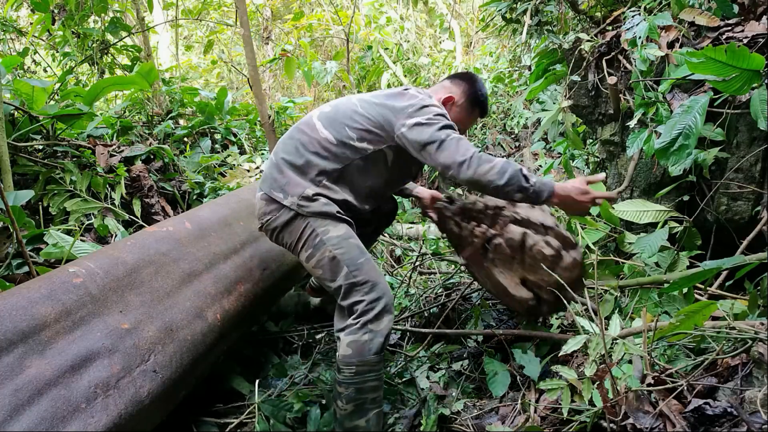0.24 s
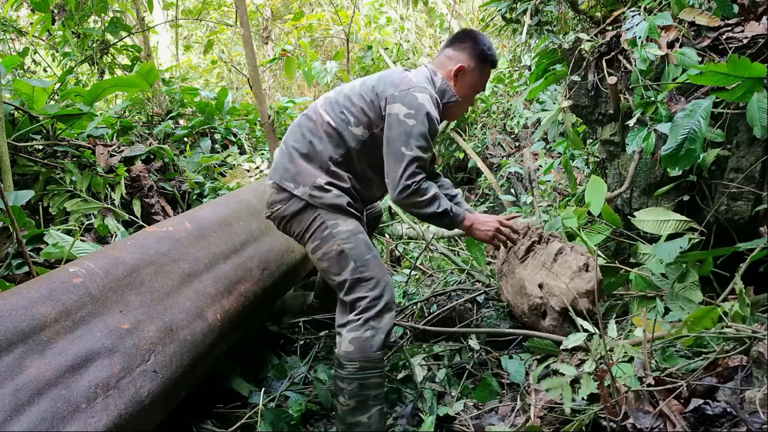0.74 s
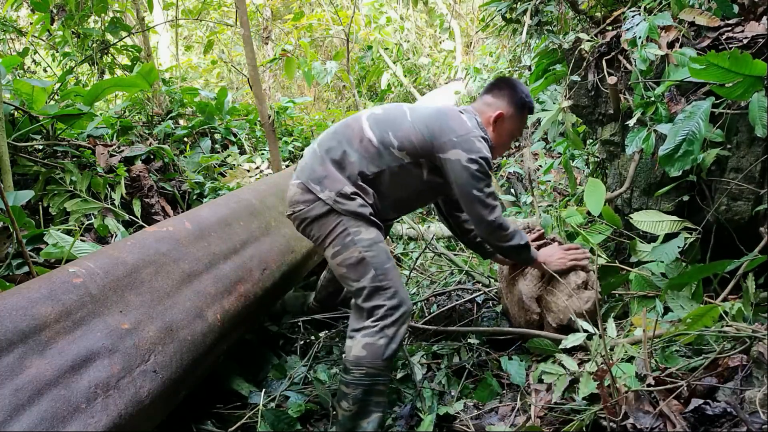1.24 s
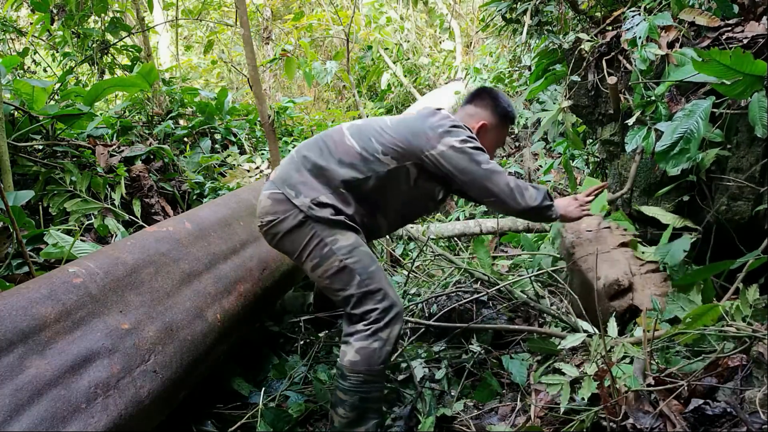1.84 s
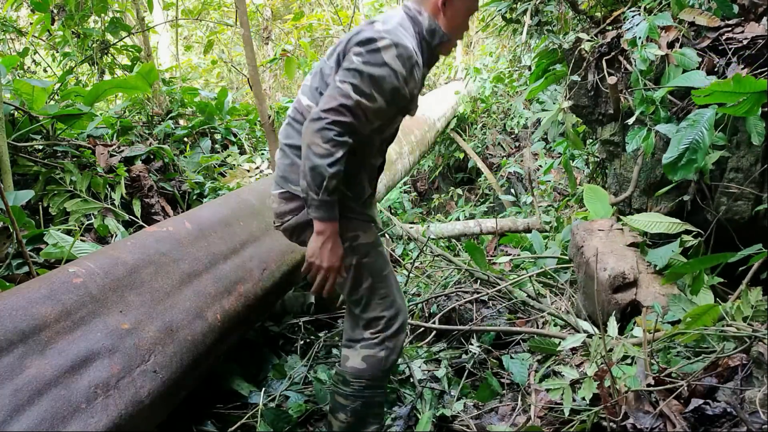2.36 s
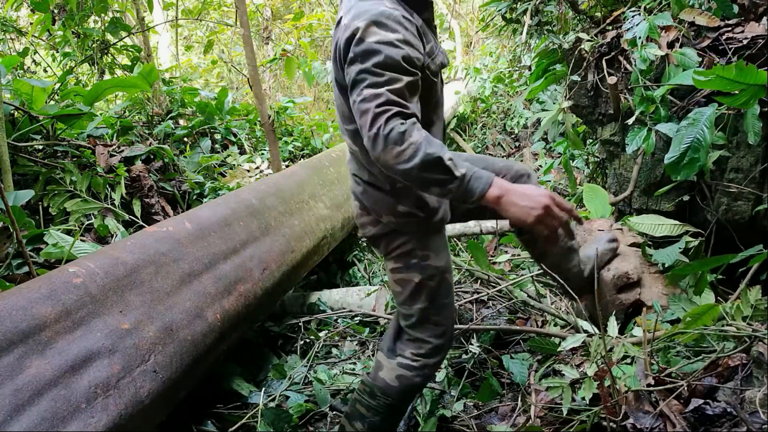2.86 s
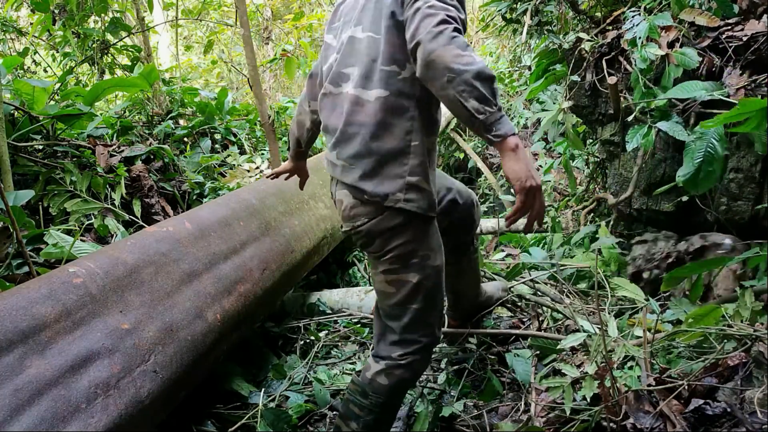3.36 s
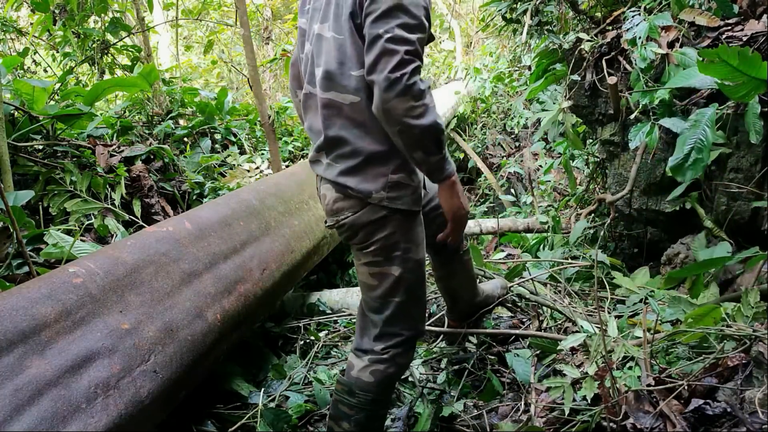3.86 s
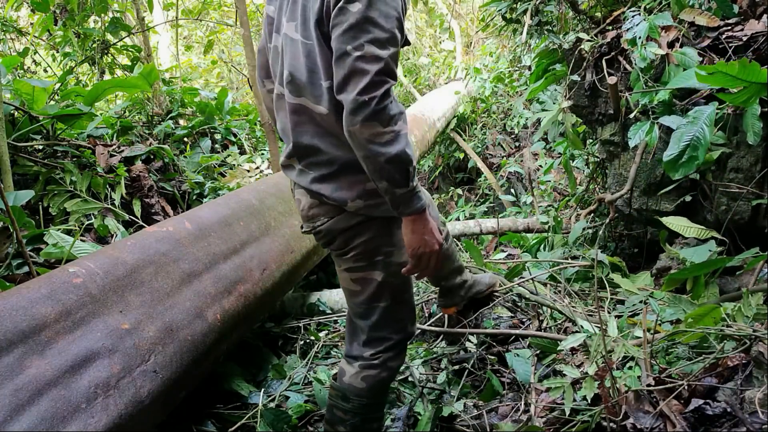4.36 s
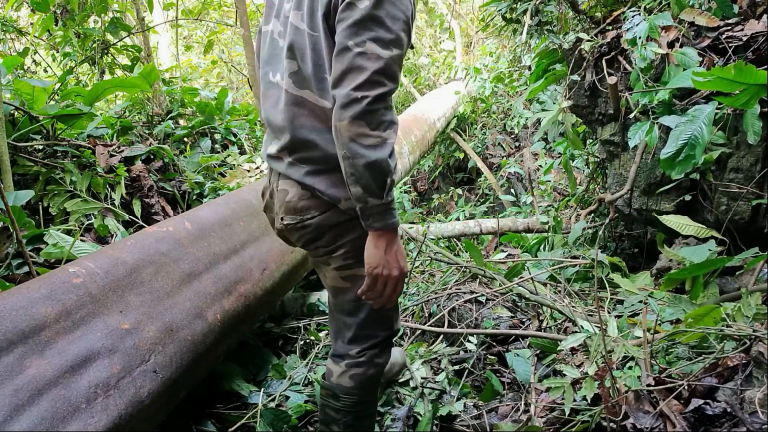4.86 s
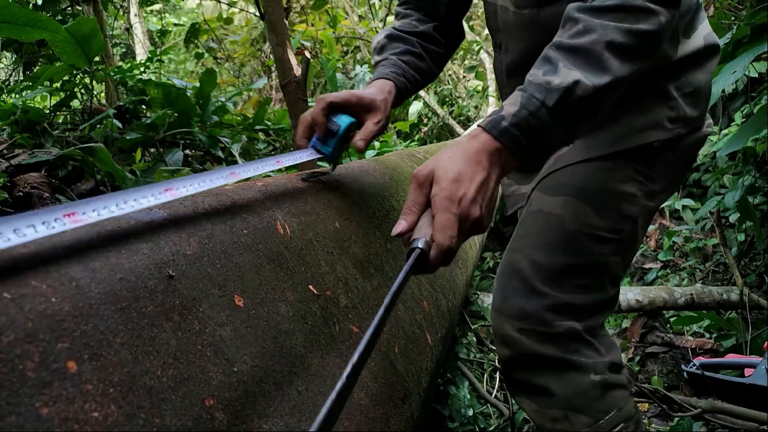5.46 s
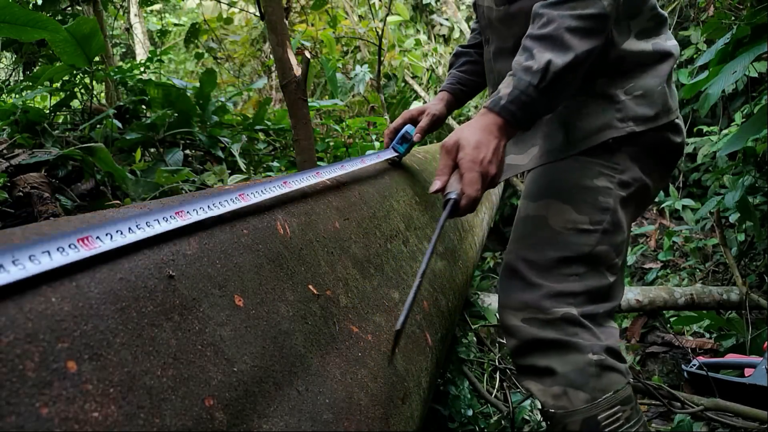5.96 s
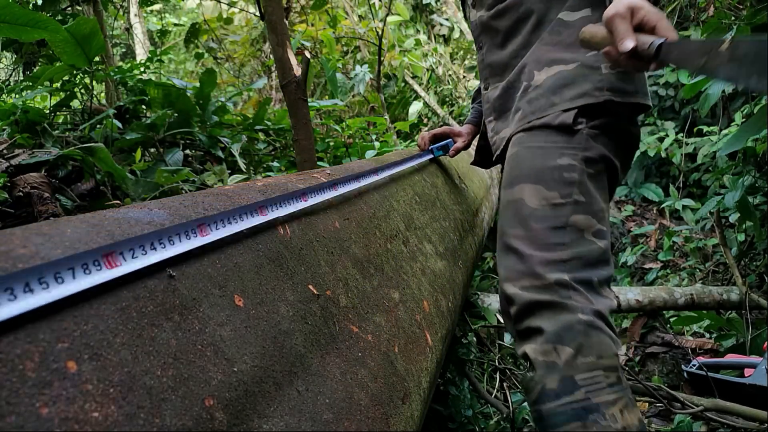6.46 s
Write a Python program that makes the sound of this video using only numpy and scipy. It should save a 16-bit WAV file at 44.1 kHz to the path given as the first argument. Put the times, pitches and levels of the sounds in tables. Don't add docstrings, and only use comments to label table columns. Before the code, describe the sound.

Quiet forest air with distant whistles; one sharp woody crash, rustling leaves, a louder hollow double knock, then faint ticks and brushing on bark.

```python
import sys
import numpy as np
from scipy import signal
from scipy.fft import rfft, irfft, next_fast_len
from scipy.io import wavfile
from scipy.ndimage import uniform_filter1d

SR = 44100
rng = np.random.default_rng(int(sys.argv[2]) if len(sys.argv) > 2 else 0)


def boost(x):
    u = np.asarray(x, float) / 20
    return 10 ** u


def to_wav(s):
    ch = np.atleast_2d(s).T
    pcm = np.round(np.clip(ch, -1, 1) * 32767)
    wavfile.write(sys.argv[1], SR, pcm.astype(np.int16))


N = 295911
T = np.arange(N) / SR
CUT_S = 5.135


def level(x):
    return x / np.sqrt(np.mean(x ** 2))


def colour(x, points):
    hz, db = np.transpose(points)
    length = x.shape[-1]
    size = next_fast_len(length)
    log_hz = np.log(np.fft.rfftfreq(size, 1 / SR) + 1)
    gain = boost(np.interp(log_hz, np.log(hz), db, left=-90, right=-90))
    return irfft(rfft(x, size) * gain, size)[..., :length]


def noise(*shape):
    return rng.standard_normal(shape)


def walk(rate):
    hold = int(SR / rate)
    steps = np.repeat(noise(N // hold + 1), hold)
    return 1.2 * uniform_filter1d(steps, hold)[:N]


def add(out, x, s):
    i = int(s * SR)
    n = min(len(x), N - i)
    out[i:i + n] += x[:n]


def decay(t, t60):
    return np.exp(-np.log(1000) * t / t60)


def ring(modes, contact, share=0.85, tint_db=0., crack_db=-18):
    hz, db, t60 = np.transpose(modes)[:, :, None]
    t = T[:SR // 4]
    sense = (-1.) ** np.arange(len(hz))[:, None]
    tones = sense * boost(db + tint_db) * np.sin(2 * np.pi * hz * t) * decay(t, t60 * share)
    push = T[:600] * np.exp(-4 * T[:600] / contact)
    body = signal.fftconvolve(np.sum(tones, axis=0), push)[:len(t)]
    body = body * np.clip((t[-1] - t) / .05, 0, 1)
    bark = [(0.29 / contact, -20), (1.5 / contact, 0), (2.0 / contact, -12), (6 / contact, -42)]
    crack = np.exp(-t / 0.0045) * colour(noise(len(t)), bark)
    return body / np.max(np.abs(body)) + boost(crack_db) * crack / np.max(np.abs(crack))


def grains(rate, spread_db, smooth):
    size = boost(spread_db * np.minimum(rng.exponential(size=N), 2))
    clicks = size * (rng.random(N) < rate / SR) * rng.uniform(-1.02, 1, N)
    return level(clicks) + smooth * noise(N)


def sweeps(peak_s, peak_db, rise_db_s, fall_db_s):
    coarse = T[::44]
    since = coarse - peak_s[:, None]
    slope = np.where(since < 0, np.reshape(rise_db_s, (-1, 1)) * since, -fall_db_s * since)
    return np.interp(T, coarse, boost(peak_db[:, None] + slope).sum(axis=0))


# time_s, left_port_late_by_samples, left_minus_right_db
POSITION = [
    (0, 9, -1),
    (.44, 9, -1),
    (.48, 9, 2),
    (1.4, 9, -1),
    (3.0, 11, -2.5),
    (4.9, 11, -1),
    (5.2, -9, 3),
    (6.2, -9, 3),
    (6.5, 8, 0),
]


def ports(x, pan_db, apart, lag_share=0.96):
    s, lag, side_db = np.transpose(POSITION)
    half_lag = lag_share * np.interp(T, s, lag) / 2
    side_db = np.interp(T, s, side_db) + pan_db
    treble = signal.lfilter([1, -1], [1, -.88], x)
    out = []
    for side in (1, -1):
        scatter = noise(2000) * np.exp(-T[:2000] / .007) / 12
        delay = np.round(side * half_lag).astype(int)
        direct = x[np.clip(np.arange(N) - delay, 0, N - 1)]
        scattered = signal.fftconvolve(treble, scatter)[:N]
        out.append(boost(side * side_db / 2) * (direct + apart * scattered))
    return np.array(out)


# pitch_hz, level_db (per Hz)
FOREST_AIR = [(15, -3.5), (25, 7), (45, -12.5), (110, -16.5), (350, -19.5), (700, -27), (1150, -29.5),
              (2000, -29.5), (2700, -27), (3800, -28), (5600, -29), (8500, -38.5), (14500, -44.5),
              (16000, -51)]
# pitch_hz, width_hz, level_db
CHORUS = [
    (7186, 1500, -66),
    (3003, 640, -66.5),
    (1530, 310, -68.5),
]
CHORUS_CHANGE = (-0.5, -6.5, -9.5)


def forest():
    mid, side = colour(noise(2, N), FOREST_AIR)
    side = colour(side, [(15, 9.5), (150, -3), (600, -4.5), (1500, 1.0), (20000, -0.5)])
    air = (mid + side * np.array([[1], [-1]])) / np.std(mid)
    out = boost(-60 + 0.27 * walk(6.7)) * air
    for (hz, width, db), change_db in zip(CHORUS, CHORUS_CHANGE):
        shape = [(hz - width, -25), (hz - width / 3, -3), (hz, 0), (hz + width / 3, -2), (hz + width * 0.88, -25)]
        gain = boost(db + change_db * (T > CUT_S) + .7 * walk(8))
        out = out + gain * level(colour(noise(2, N), shape))
    return out


# pitch_hz, level_db
SWAY = [(3, -4), (8, 3), (14, -7.5), (22, -23.5)]


def mount_sway():
    return boost(-43) * level(colour(noise(N), SWAY))


# time_s, leaf_stir_db, load_on_sticks_and_soil_db
STIR = [(0, -66, -71), (.37, -77, -75), (.56, -50.5, -60), (.7, -51.5, -56.5), (.84, -59.5, -60.5),
        (1.06, -63, -61), (1.29, -73, -79), (1.74, -63, -62), (2.02, -60.5, -60.5), (2.75, -79, -72),
        (2.97, -68.5, -72), (3.059, -54.5, -55.5), (3.44, -53.5, -48), (3.66, -56, -54),
        (4.07, -65.5, -65.5), (4.3, -79.5, -76), (5.53, -76.5, -77), (6.199, -90, -76), (6.71, -61.5, -65)]
# peak_s, leaves_db, soil_jolt_db, build_up_db_per_s, dry_top_minus_leaves_db
SWEEPS = [(.335, -67.5, -65, 910, -2), (0.391, -46.5, -57, 2499, -30), (0.432, -57, -43.5, 302.5, -30),
          (0.487, -25.5, -37, 344, -8.5), (1.641, -51.5, -74, 245, -9.5), (1.96, -49, -49.5, 700, -14),
          (2.075, -81, -91, 1502, 10), (2.9, -59, -52, 2500, -10.5), (3.017, -53.5, -61, 2500, -10),
          (3.059, -47.5, -59.5, 1800, -19), (3.078, -50, -51.5, 1500, 4.5),
          (3.132, -42.5, -58.5, 1500, -7.5), (3.21, -57, -68.5, 159, -2), (3.33, -61.5, -60, 398, -4.5),
          (3.484, -45.5, -38.5, 902, -11.5), (3.555, -49, -54.5, 600, -5.5), (3.599, -51, -28.5, 300, -10),
          (4.002, -68.5, -63, 1500, 4), (4.102, -52.5, -57, 1997.5, -20), (4.177, -42, -56.5, 3000, -11),
          (4.76, -80.5, -80, 100, 6.5), (5.03, -72, -79, 1500, -3), (5.09, -69.5, -72, 300, -4),
          (5.135, -77, -80, 1000, -11), (5.55, -73, -73, 41, -2.5), (5.665, -70, -78, 1500, 0),
          (5.695, -71.5, -67, 300, 0), (6.66, -64.5, -80, 66, -7)]
# pitch_hz, level_db
LEAVES = [(500, 4), (1200, 2), (2000, 7), (3500, 5.5), (6000, -4), (8000, -7), (11000, -57), (16000, -116)]
# pitch_hz, level_db
DRY_TOP = [(5000, -23.5), (7500, -11), (9000, -17.5), (12000, -16.5), (14500, -24.5), (16000, -22)]
# pitch_hz, level_db
STICKS = [(200, -32), (400, -6), (700, 4.5), (1000, -1.5), (1500, -4), (2500, -16)]
# pitch_hz, level_db
GROUND = [(15, -29), (35, -3), (70, 5.5), (150, -8), (300, -0.5), (500, -15)]
SETTLE_DB_S, JOLT_RISE_DB_S, JOLT_DB_S = 304, 1200, 196
TOP_DB, STICK_DB, SOIL_DB, JOLT_STICK_DB = -13, -5, -1.45, -16.5


def litter():
    s, stir_db, load_db = np.transpose(STIR)
    peak_s, sweep_db, jolt_db, rise, dry_db = np.transpose(SWEEPS)
    stir_db = np.interp(T, s, stir_db)
    stirred = boost(stir_db) + sweeps(peak_s, sweep_db, rise, SETTLE_DB_S)
    crisp = boost(stir_db + TOP_DB) + sweeps(peak_s, sweep_db + dry_db, rise, SETTLE_DB_S)
    load = boost(np.interp(T, s, load_db))
    jolt = sweeps(peak_s, jolt_db, JOLT_RISE_DB_S, JOLT_DB_S)

    crackle = grains(1200., spread_db=4.5, smooth=.6) * boost(2 * walk(30))
    leaves = level(colour(crackle, LEAVES))
    dry_top = level(colour(crackle, DRY_TOP))
    clack = (boost(STICK_DB) * load + boost(JOLT_STICK_DB) * jolt) * boost(2 * walk(28))
    sticks = level(colour(grains(500., spread_db=3.5, smooth=.7), STICKS))
    rumble = level(colour(grains(200., spread_db=3.0, smooth=.9), GROUND))
    soil = (boost(SOIL_DB) * load + jolt) * boost(2 * walk(15)) * rumble

    patches = []
    for k in (0, N // 3, 2 * N // 3):
        patch = 0.76 * stirred * np.roll(leaves, k) + crisp * np.roll(dry_top, k)
        patches.append(patch + clack * np.roll(sticks, k))
    shared, left, right = patches
    return ports(shared + soil, 0., apart=0.24) + 1.406 * np.array([left, right])


# start_s, peak_db, contact_cutoff_hz, ring_share (0 to 1)
BLOWS = [(0.029, -48.5, 1300, 0.58), (.388, -40, 870, 0.44), (0.4735, -13.5, 320, 0.2),
         (0.482, -16, 330, 0.45), (1.612, -60, 1300, 0.12), (1.635, -44.5, 1500, 0.19),
         (1.681, -51, 200, .95), (1.956, -42.5, 600, 0.4), (1.986, -49, 500, 0.35), (2.03, -51, 300, 0.2),
         (2.15, -47, 990, 0.2), (2.55, -48, 420, 0.3), (2.574, -52, 300, 0.9), (2.8972, -28.5, 1000, 0.31),
         (3.058, -41, 1205, .3), (3.14, -37.5, 395.7, .95), (3.267, -35, 246.6, 0.7), (3.289, -33, 245, .6),
         (3.315, -36, 910, 0.3), (3.329, -39, 252, .5), (3.396, -35.5, 1000, .95), (3.423, -34, 1000, 0.1),
         (3.494, -34, 600, .7), (3.515, -31, 623, .7), (3.53, -34, 300, .1), (3.564, -29, 400, .6),
         (3.687, -33.5, 399, 0.7), (3.789, -29.5, 200, .7), (4.176, -43.5, 1500, 0.36)]
# start_s, peak_db
STEPS = [
    (4.94, -54.5),
    (4.981, -59.5),
    (5.081, -68),
    (5.11, -55),
]
# start_s, peak_db
TAPS = [
    (6.53, -62),
    (6.567, -66),
    (6.601, -54),
    (6.639, -57),
    (6.67, -62),
    (6.7, -60),
]
# pitch_hz, level_db, t60_s
BLOCK = [(74.4, 4.5, 0.055), (113.9, -6, 0.13), (154, 0.5, 0.074), (234.6, 4, 0.13), (300, 2.5, 0.094),
         (366.8, -3.5, 0.16), (468.4, 2.5, 0.009), (621, 3, 0.082), (690, 0.5, 0.028), (774, 8.5, 0.12),
         (903, 2.5, 0.064), (1190, 14, 0.079), (1500, 3.5, 0.017), (1889, 5, .014), (2508, -18.5, .02)]


def block():
    out = np.zeros(N)
    rocks = [(.52 + k * 0.023, -33.5 - 4.5 * k, 129, 0.78) for k in range(4)]
    steps = [(s, db, 1300, 0.2) for s, db in STEPS]
    taps = [(s, db, 750, 0.11) for s, db in TAPS]
    for s, db, hz, share in list(BLOWS) + rocks + steps + taps:
        detune, tint = noise(2, len(BLOCK))
        modes = np.array(BLOCK, float)
        modes[:, 0] *= 1 + .04 * detune
        blow = ring(modes, 0.9 / hz, share=max(share, .1) * 2.1, tint_db=2 * tint[:, None])
        add(out, boost(db) * blow, s)
    return ports(out, 0.9, apart=0.6)


# start_s, peak_db, centre_hz
SNAPS = [(0.033, -46, 3110), (0.3292, -43.5, 3100), (0.3864, -37.5, 3500), (0.4643, -39, 5250),
         (0.4745, -14, 2500), (0.4797, -7.5, 5130), (0.4915, -10, 2210), (0.5086, -22.5, 2400),
         (1.431, -49, 7420), (1.613, -57, 3000), (1.637, -31.5, 7000), (1.956, -33.5, 3880),
         (1.972, -38, 3880), (1.9833, -55, 2850), (2.0341, -44, 3720), (2.07, -47, 4100),
         (2.2032, -42.5, 3620), (3.017, -43, 7820), (3.0584, -37.5, 3950), (3.076, -22.5, 4770),
         (3.1306, -22.5, 2943), (3.146, -26.5, 6770), (3.1777, -44.5, 2890), (3.4914, -39, 3770),
         (3.5604, -37.5, 3496), (3.9965, -58, 3070), (4.0974, -49, 3700), (4.177, -47, 7000),
         (4.1795, -29, 3270)]
# start_s, peak_db
TICKS = [(5.0784, -43), (5.585, -46), (5.6888, -45), (5.9266, -49.5), (6.439, -56.5), (6.4785, -47.5),
         (6.598, -59), (6.636, -44), (6.662, -55), (6.699, -60)]


def snaps():
    out, t = np.zeros(N), T[:SR // 4]
    fade = decay(t, .01) + 2.8 * np.exp(-t / 0.0017)
    for s, db, hz in list(SNAPS) + [(s, db, 3100) for s, db in TICKS]:
        shape = [(hz / 8, -24), (hz / 3, -6), (hz, 0), (hz + 3500, -6), (15000, -20), (16300, -40)]
        burst = fade * colour(noise(len(t)), shape)
        add(out, boost(db) * burst / np.max(np.abs(burst)), s)
    return ports(out, 0., apart=1.0)


# start_s, length_s, start_hz, level_db
FULL_BIRD = [
    (3.87, 0.1, 1533, -62.5),
    (4.25, 0.29, 1546, -63.5),
    (4.55, 0.18, 1606, -72),
    (4.735, 0.31, 1556, -60),
]
THIN_BIRD = [(.045, 0.268, 1458, -63.5), (.93, 0.16, 1470, -72), (1.2, 0.21, 1530, -78),
             (2.1, 0.12, 1530, -76), (2.45, 0.23, 1530, -78), (3.9, 0.24, 1523, -71.5),
             (4.24, 0.05, 1530, -56), (4.53, 0.235, 1523, -63), (5.04, 0.13, 1521, -57),
             (5.55, 0.24, 1548, -73), (6.2, 0.24, 1550, -73)]
DULL_BIRD = [
    (.16, 0.22, 1528, -69.5),
    (.66, 0.14, 1540, -64.5),
    (1.12, 0.18, 1518, -67),
    (1.46, 0.072, 1500, -73),
    (2.4, 0.205, 1500, -66),
    (2.92, 0.14, 1500, -71),
]
# first_db, second_db (an octave up)
FULL_TONES = (-2.5, 0.5)
THIN_TONES = (-11.5, 1)
DULL_TONES = (0., -8.)
RISE_HZ_S, SWELL_S, FADE_S = 179.3, 0.033, 0.043


def bird():
    out = np.zeros(N)
    wobble, flutter = 1 + .0045 * walk(70), boost(3 * walk(55))
    birds = ((FULL_BIRD, FULL_TONES), (THIN_BIRD, THIN_TONES), (DULL_BIRD, DULL_TONES))
    for notes, (low_db, high_db) in birds:
        for start, length, hz, db in notes:
            t = T[:int(length * SR)]
            gate = np.clip(np.minimum(t / SWELL_S, (t[-1] - t) / FADE_S), 0, 1)
            pitch = (hz + RISE_HZ_S * t) * wobble[int(start * SR):][:len(t)]
            phase = 2 * np.pi * np.cumsum(pitch) / SR
            whistle = boost(low_db) * np.sin(phase) + boost(high_db) * np.sin(2 * phase)
            add(out, boost(db) * gate * whistle, start)
    return ports(np.sqrt(2) * out * flutter, -3.5, apart=0.49, lag_share=0)


# start_s, peak_db, pitch_hz,
# t60_s
KNOCKS = [(.463, -30, 262, 0.041), (.477, -12, 1946, .05), (.502, -25, 239, .1), (.521, -32.5, 62, .35),
          (.56, -33, 55, .4), (.645, -41.5, 300, 0.074), (.68, -44, 300, .06), (.715, -56, 150, .08),
          (.86, -47.5, 166, 0.24), (1.6084, -42, 590, 0.0094), (1.6146, -36, 960, 0.021),
          (1.636, -29.5, 890, 0.0088), (1.6089, -36, 1500, 0.011), (1.621, -47, 2680, .012),
          (1.637, -32, 1600, 0.012), (1.6405, -36, 2600, .012), (1.642, -43, 1000, 0.017),
          (1.66, -44, 2600, .015), (1.79, -50.5, 175, 0.091), (2.899, -30.5, 201, 0.029),
          (3.02, -44, 750, 0.036), (3.058, -33.5, 925, 0.027), (3.1305, -27, 1700, .015),
          (3.396, -31, 1080, 0.02), (3.425, -40, 1300, .02), (3.264, -38, 120, .08), (3.289, -34, 94, 0.1),
          (3.316, -36, 1110, .02), (3.492, -30.5, 87.4, 0.21), (3.512, -37, 556, .08),
          (3.567, -26, 170, 0.066), (3.5929, -17.5, 790, 0.028), (3.5965, -16.5, 1080, 0.026),
          (3.5983, -10, 190, .04), (3.6033, -14, 300, .04), (3.618, -19, 330, .06), (3.746, -21, 235, .04),
          (3.7475, -42, 1600, 0.022), (3.7561, -25.5, 575, 0.081), (3.767, -29.5, 186, .1),
          (3.79, -27.5, 171, 0.11), (3.806, -33, 300, 0.077), (3.84, -47, 203, 0.094),
          (3.868, -49, 300, .06), (3.889, -49, 79.6, 0.18), (4.174, -42, 800, 0.032),
          (4.1777, -31, 977, 0.021)]
# start_s, peak_db, pitch_hz, t60_s
TRUNK_KNOCKS = [(5.585, -52.5, 894, .02), (6.438, -51.5, 2000, 0.023), (6.481, -53, 800, .02),
                (6.526, -54, 480, 0.067), (6.56, -51, 440, 0.054), (6.597, -47.5, 478, .04),
                (6.624, -51, 700, .03), (6.637, -45.5, 1000, .03), (6.65, -52, 800, .03),
                (6.7025, -41.5, 665, .04)]
# multiple_of_pitch, level_db, share_of_t60
STICK_MODES = [(.62, -10.5, 0.79), (1.0, -0.5, 0.98), (1.45, -4, .8), (1.95, -5, 0.65), (2.6, -13, 0.44)]


def knocks():
    out = np.zeros(N)
    for s, db, hz, t60 in list(KNOCKS) + list(TRUNK_KNOCKS):
        modes = np.array(STICK_MODES) * [hz, 1, t60]
        add(out, boost(db) * ring(modes, .45 / hz, crack_db=-18.5), s)
    return ports(out, 0., apart=.6)


# time_s, pitch_hz, level_db
SCRAPE = [
    (.86, 902, -71),
    (.92, 1150, -55),
    (.98, 1500, -54.5),
    (1.04, 1820, -55),
    (1.08, 1898, -57),
    (1.101, 1930, -78),
]


def scrape():
    s, hz, db = np.transpose(SCRAPE)
    pitch = np.interp(T, s, hz) * (1 + .08 * walk(700))
    gain = boost(np.interp(T, s, db, left=-120, right=-120) + 3.5 * walk(250))
    return ports(gain * np.sin(2 * np.pi * np.cumsum(pitch) / SR), 0., apart=.3)


# start_s, peak_db, contact_s
FALLS = [
    (3.592, -16.5, 0.0021),
    (3.596, -4, 0.00086),
    (3.5985, -4.5, 0.0025),
    (3.6045, -14, 0.0016),
    (3.617, -21.5, 0.0053),
]
# pitch_hz, level_db, t60_s
FALL = [(100, -8, 0.23), (128, -4.5, 0.17), (154.7, 0, 0.09), (190, 0, 0.11), (246, 0.5, 0.11),
        (317.5, -7, 0.15), (357.9, -1, 0.13), (456, -3, 0.17), (533, -0.5, 0.08), (579, 8.5, 0.099),
        (706.7, -6.5, 0.1), (936, 8.5, 0.053), (1080, 5.5, 0.024), (1590, 0, 0.028)]
# start_s, peak_db, contact_s
BOUNCES = [
    (3.745, -25.5, 0.00085),
    (3.7465, -14, 0.0026),
    (3.752, -17.5, 0.0032),
]
# pitch_hz, level_db, t60_s
BOUNCE = [(96.2, 0, 0.45), (160, 2, 0.14), (235.8, 10, 0.062), (303.6, 9, 0.0503), (382, 1, 0.15),
          (464, -3.5, 0.071), (554, -5, 0.22), (788, -9.5, 0.027), (1000, -10.5, .021), (1375, -9.5, .017),
          (1783, -12.5, .015)]


def fall():
    out = np.zeros(N)
    for hits, modes in ((FALLS, FALL), (BOUNCES, BOUNCE)):
        for s, db, contact in hits:
            add(out, boost(db) * ring(modes, contact, crack_db=-19.5), s)
    return ports(out, 1.2, apart=0.6)


# pitch_hz, level_db
PUFF = [(20, -12), (50, 10), (110, 0.5), (220, -25)]


def puffs():
    return (T > CUT_S) * boost(-72 + 6 * walk(14)) * level(colour(noise(N), PUFF))


# time_s, level_db
CRICKET = [
    (5.2, -84.5),
    (5.35, -66.5),
    (5.55, -61.5),
    (5.72, -70.5),
    (5.9, -76),
]
# pitch_hz, level_db
CRICKET_BAND = [(2500, -18), (3600, -4), (4750, -0.5), (6000, -4), (9000, -10), (13000, -14)]


def insect():
    s, db = np.transpose(CRICKET)
    gain = boost(np.interp(T, s, db, left=-120, right=-120) + 3.2 * walk(40))
    return gain * level(colour(noise(2, N), CRICKET_BAND))


def trunks(x, t60, wet_db):
    t = T[:SR // 2]
    tail = noise(2, len(t)) * decay(t, t60) * np.clip(t / 0.0043, 0, 1)
    tail = colour(tail, [(30, -52.0), (200, -22.5), (800, -19.5), (4000, -13.5), (16000, -17.5)])
    tail = tail / np.sqrt(np.sum(tail ** 2) / 2)
    return boost(wet_db) * signal.fftconvolve(x, tail, axes=1)[:, :N]


def scene():
    near = litter() + block() + snaps() + scrape() + fall()
    near = near + trunks(near, t60=0.098, wet_db=-9.0)
    whistles = bird()
    before = T < CUT_S
    far = whistles * (before | (T > CUT_S + .1)) + before * trunks(whistles, t60=.3, wet_db=-5)
    return near + far + forest() + mount_sway() + knocks() + puffs() + insect()


def top_cut(x):
    return signal.sosfilt(signal.butter(12, 16460, fs=SR, output="sos"), x)


def record(dry):
    mix = colour(dry, [(1, -44.5), (24, -8.5), (50, -2.0), (15650, -1), (15900, -32.5)])
    return top_cut(mix)


dry = scene()
out = record(dry)
to_wav(out)
```